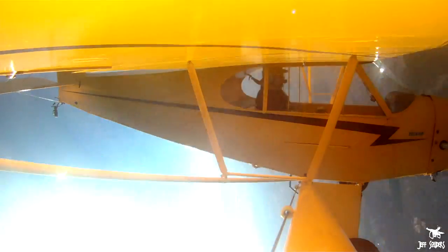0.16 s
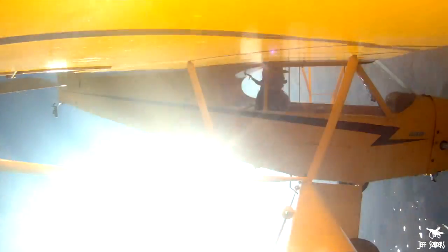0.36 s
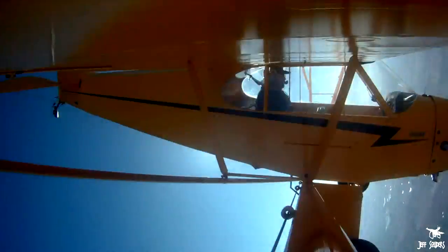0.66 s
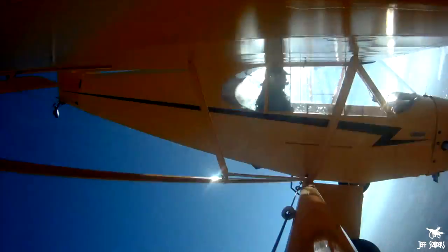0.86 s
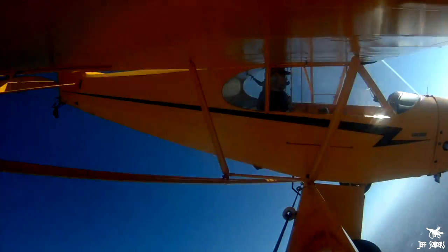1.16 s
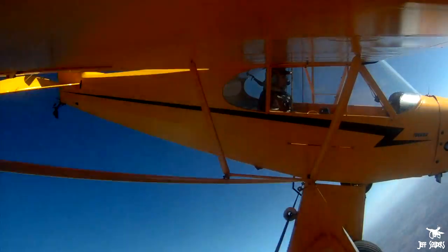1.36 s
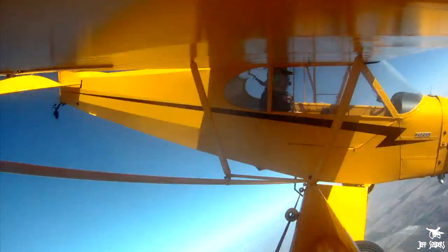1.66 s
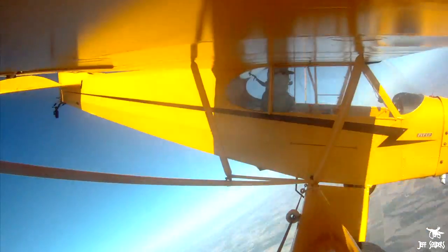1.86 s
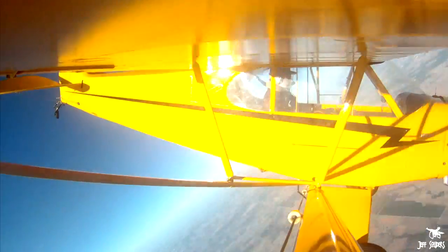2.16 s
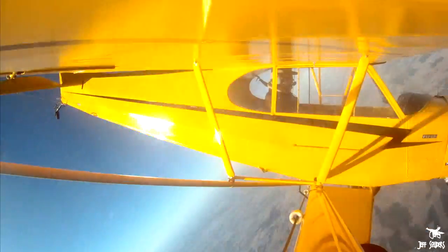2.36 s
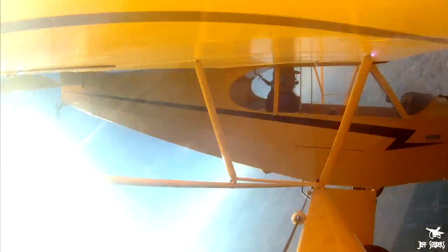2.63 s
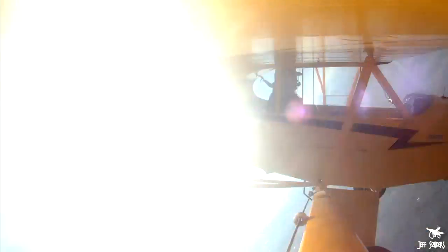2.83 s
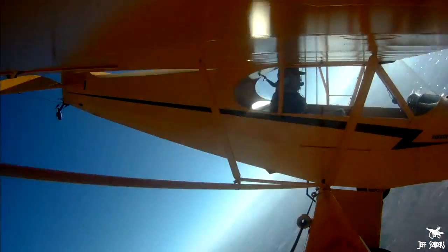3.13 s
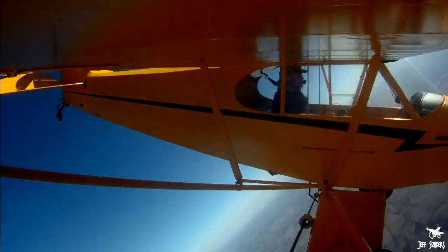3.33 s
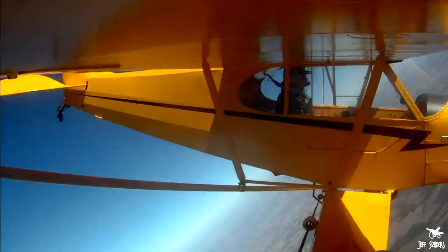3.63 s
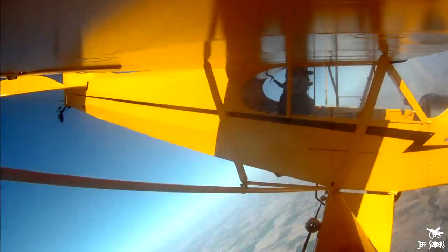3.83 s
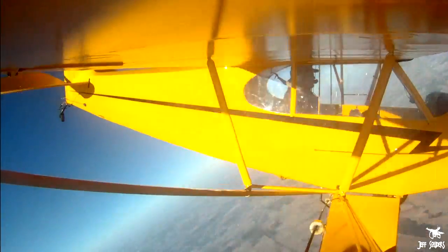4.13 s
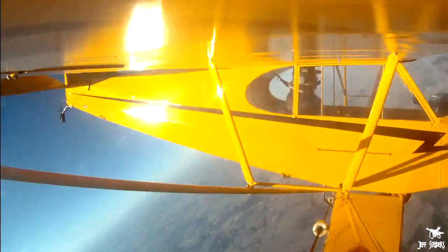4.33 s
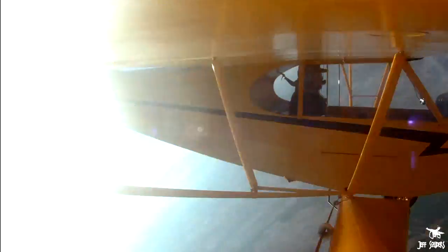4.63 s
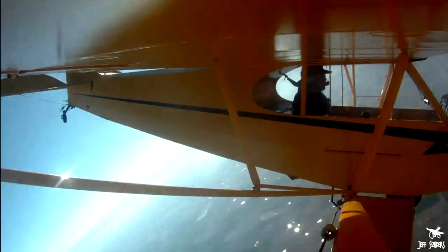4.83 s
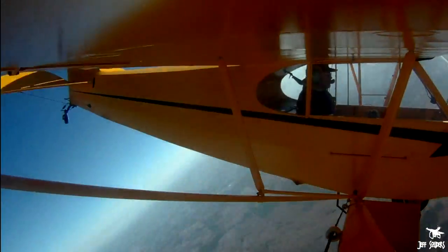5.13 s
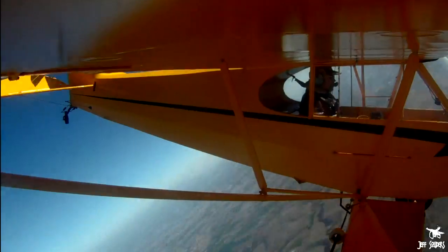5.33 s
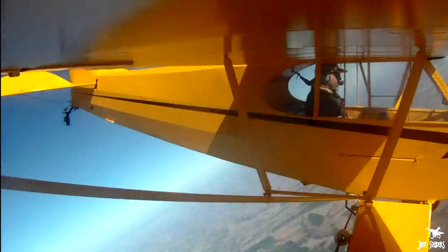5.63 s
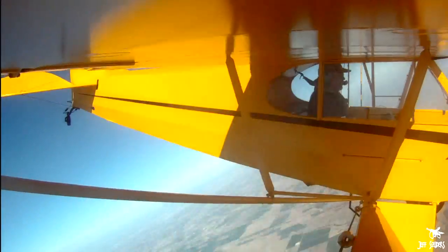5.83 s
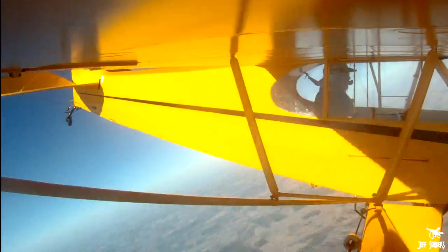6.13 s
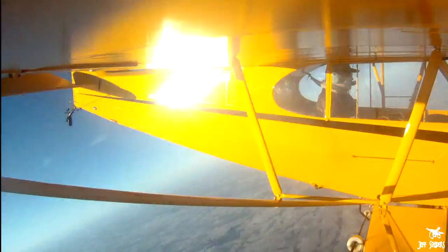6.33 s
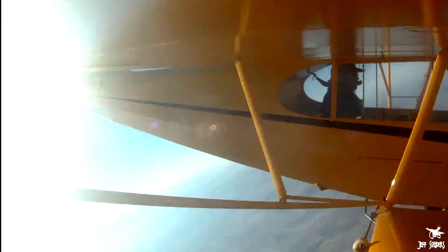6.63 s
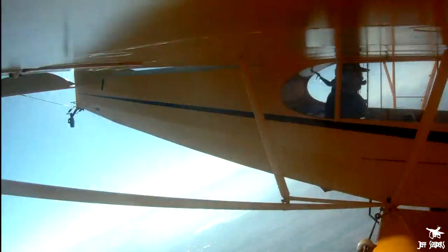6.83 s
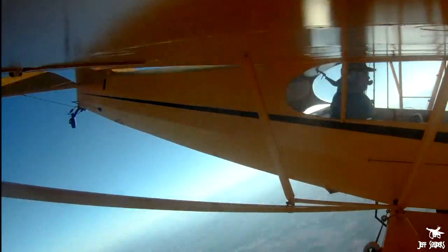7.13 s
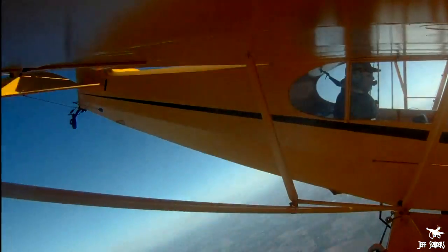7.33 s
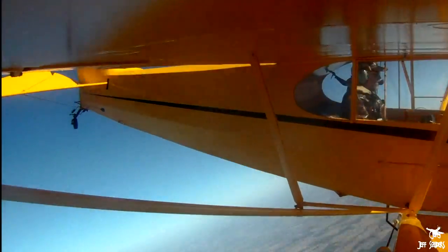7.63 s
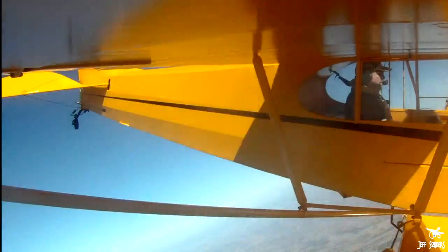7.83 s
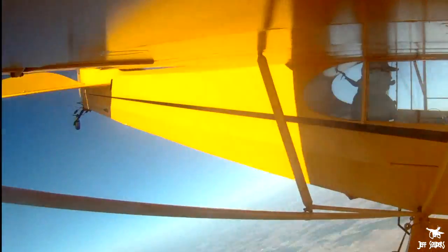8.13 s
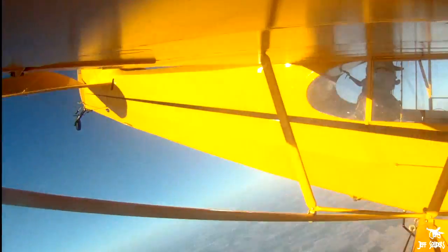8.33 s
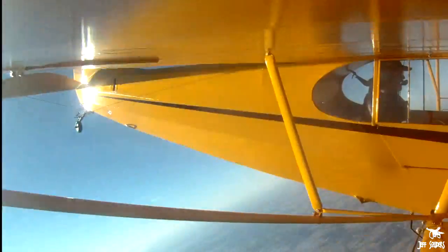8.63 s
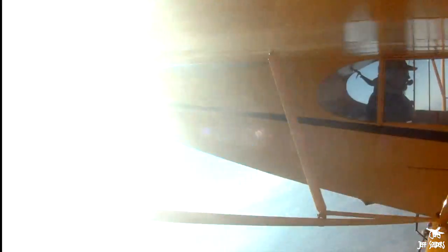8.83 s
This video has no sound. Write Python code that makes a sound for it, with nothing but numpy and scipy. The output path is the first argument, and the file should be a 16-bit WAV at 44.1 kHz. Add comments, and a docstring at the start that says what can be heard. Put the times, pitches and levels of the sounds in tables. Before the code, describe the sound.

Heard from the wing strut, a propeller plane's low drone sags to a lumpy idle while a loose camera case chatters and air roars.

```python
"""The engine and propeller of a light aircraft drone as it is throttled back from full power to idle.
A cased camera on the wing strut hears it: engine orders are sines, swelling in the mount's resonance.
The strut throbs; knocks, rattles and dry ticks are shaped noise and impulses, many timed once a turn.
Filtered noise makes the gusty slipstream roar and hiss; coarse sampling adds a glassy fizz."""
import sys
import numpy as np
from scipy import signal
from scipy.fft import rfft, irfft
from scipy.io import wavfile
from scipy.ndimage import map_coordinates

SR = 44100
rng = np.random.default_rng(int(sys.argv[2]) if len(sys.argv) > 2 else 0)


def put_to_file(sound):
    """Save the sound as 16-bit audio at rate SR, in the file named by the first command-line argument."""
    columns = np.atleast_2d(sound).T  # one column per channel
    safe = np.clip(columns, -1, 1)
    whole_steps = np.round(safe * 32767)
    wavfile.write(sys.argv[1], SR, whole_steps.astype(np.int16))


N = 396018


def amp(db):
    """Decibels to gain."""
    return 10 ** (np.asarray(db) / 20)


def unit(x):
    """Scale to rms 1."""
    return x / np.sqrt(np.mean(x ** 2) + 1e-20)


def along(points, hz):
    """Read (Hz, value) points on a log frequency axis."""
    f, v = np.transpose(points)
    return np.interp(np.log(hz + 1), np.log(np.maximum(f, 1) + 1), v)


def curves(rows):
    """Automation: one value per sample for each column after the time."""
    s, *cols = np.transpose(rows)
    return [np.interp(np.arange(N) / SR, s, c) for c in cols]


def bells(rows):
    """The sum of one smooth bell in dB for each (centre_s, half_width_s, change_db) row."""
    t = np.arange(N) / SR
    return sum(db * np.exp(-((t - s) / width) ** 2) for s, width, db in rows)


def spells(rows, attack_s, release_s):
    """An envelope that rises, holds and dies away for each (start_s, end_s, level_db) row."""
    t = np.arange(N) / SR
    envelopes = []
    for start, end, db in rows:
        rise = np.clip((t - start) / attack_s, 0, 1)
        fall = np.exp(-np.maximum(t - end, 0) / release_s)
        envelopes.append(amp(db) * rise * fall)
    return np.max(envelopes, axis=0)


def wobble(rate_hz):
    """A smooth random curve with rate_hz random knots a second."""
    knots = rng.standard_normal(int(N * rate_hz / SR) + 4)
    return map_coordinates(knots, [np.arange(N) * rate_hz / SR])


def colour(x, spectrum, resonances=(), size=8192):
    """Minimum-phase filter: a broad spectrum with resonances lifted out of it or cut into it."""
    hz = np.fft.rfftfreq(size, 1 / SR)
    db = along(spectrum, hz)
    for f, width, lift in resonances:
        db = db + lift / (1 + (2 * (hz - f) / width) ** 2)
    # folding the cepstrum forward in time makes the filter causal
    cepstrum = irfft(np.log(amp(db)))
    cepstrum[1:size // 2] *= 2
    cepstrum[size // 2 + 1:] = 0
    impulse_response = irfft(np.exp(rfft(cepstrum)))
    return signal.fftconvolve(x, impulse_response)[:len(x)]


def uneven(count, scatter_db):
    """Random gains around 0 dB, kept within two scatters."""
    return amp(scatter_db * np.clip(rng.standard_normal(count), -2, 2))


def bursts(cycles, speed, life_s, scatter_db, hold=1):
    """An envelope that jumps at each whole cycle and decays to 1/e in life_s; hold above 1 flattens its top."""
    whole = np.floor(cycles).astype(int)
    since_jump_s = (cycles % 1) / speed
    return uneven(1024, scatter_db)[whole] * np.exp(-(since_jump_s / life_s) ** hold)


def kicks(cycles, scatter_db):
    """One impulse of uneven size at each whole cycle."""
    whole = np.floor(cycles)
    return np.diff(whole, prepend=whole[0]) * uneven(N, scatter_db)


def add(track, s, sound):
    """Mix a sound into the track at s seconds."""
    part = track[round(s * SR):][:len(sound)]
    part += sound[:len(part)]


# Engine and two-blade propeller harmonics before the mount shapes them: shaft_multiple, relative_level_db
ENGINE_ORDERS = [(1, 10), (1.5, -3.5), (2, 5.5), (2.5, -20), (3, -4.5), (3.5, -20), (4, -3), (4.5, -12),
                 (5, -8), (6, -19.5), (7, -9), (8, -15), (9, -42), (10, -21.5)]
# How the strut and mount pass vibration: freq_hz, gain_db
MOUNT_RESPONSE = [(15, -25), (32, -44), (41, -54), (50, -3), (58, 2.5), (70, 0.5), (76, -5), (86, -13),
                  (110, -10.5), (160, -8.5), (380, -17)]
# Level of the whole drone before gusts: time_s, level_db
DRONE_LEVEL = [(0, -16), (1.2, -16.5), (1.5, -19), (1.85, -14.5), (3.5, -14.5), (5.75, -16.5), (6.2, -22.5),
               (6.75, -20), (7.5, -15.5), (8.05, -27.5), (8.8, -18.5)]
WAVER_DB, WAVER_RAD = 2.8, .65  # how far the orders waver in level and in phase
GUST_DRONE = 0.37  # dB by which the drone gives way for each dB of a gust


def drone(speed, turns):
    """Each order is loud while it lies in the mount's resonance; the blade order is the steadiest."""
    tone, power = np.zeros(N), np.zeros(N)
    for order, db in ENGINE_ORDERS:
        unsteady = .12 if order == 2 else 1  # order 2 is the blade order
        order_db = db + along(MOUNT_RESPONSE, order * speed)
        size = amp(order_db + WAVER_DB * unsteady * wobble(5))
        phase = 2 * np.pi * order * turns + WAVER_RAD * unsteady * wobble(8)
        tone += size * np.sin(phase)
        power += size ** 2 / 2
    even_tone = tone / np.sqrt(power)  # evened out; the level curve and the gusts set the loudness
    return amp(curves(DRONE_LEVEL)[0] - GUST_DRONE * bells(GUSTS)) * even_tone


# Broad tone of the shaken strut: freq_hz, relative_level_db_per_hz
STRUT_TONE = [(60, -13), (85, -31.5), (105, 6), (130, 0.5), (180, 1.5), (220, 2), (290, -5), (370, -7),
              (480, -26), (800, -35)]
# Level of the strut's throb: time_s, level_db
THROB_LEVEL = [(0, -46), (1.6, -36), (2.4, -34.5), (3.7, -35), (4.05, -26.5), (6, -31.5), (6.4, -30),
               (9, -45)]


def throb(turns):
    """One blade shakes the strut harder than the other, giving lines at every multiple of the shaft speed."""
    strong_blade = kicks(turns - .2, scatter_db=2.0)
    weak_blade = 0.28 * kicks(turns - .7, scatter_db=6.0)
    strut_modes = [(108, 16, 6.4), (190, 12, 6.2), (285, 32, 3.7)]  # freq_hz, width_hz, lift_db
    return amp(curves(THROB_LEVEL)[0]) * unit(colour(strong_blade + weak_blade, STRUT_TONE, strut_modes))


# Point of the turn at which the loose case strikes: time_s, strike_point_turns
CASE_STRIKE_POINT = [(1.2, 0.41), (1.8, 0.67), (2.65, 0.74), (2.73, .65), (3.2, 0.51), (3.75, 0.47),
                     (4.7, 0.37), (5, 0.34), (5.9, .47), (6.2, .78), (6.45, 1.04), (7.25, 1.34), (9, 1.79)]
# Broad tone of the case contacts: freq_hz, relative_level_db_per_hz
RATTLE_TONE = [(300, -13.5), (700, -19), (1150, -27), (1450, -3.5), (1800, 7), (2200, 2), (2450, -8.5),
               (2750, -14.5), (3350, -21.5), (3650, -21), (3950, -16), (4400, -29), (5000, -27.5),
               (5900, -36)]
# Air and wall resonances of the camera case: freq_hz, width_hz, lift_db
CASE_RESONANCES = [(1111, 20, 8.5), (1225, 29, 7), (1373, 16, 7.5), (1491, 22, 9.5), (1777.7, 17, 11.5),
                   (1910, 23, 5.5), (1950, 58, -6), (2150, 78, 2.5), (2310, 38, 10.5), (2580, 37, 11),
                   (3079, 160, 12), (3613, 199, 18.5)]
# Spells in which the case rattles: start_s, end_s, level_db
RATTLE_SPELLS = [(.18, .22, -29.5), (.92, .99, -31), (1.01, 1.16, -24.5), (1.17, 1.37, -28),
                 (1.39, 1.48, -24.5), (1.5, 1.62, -27.5), (1.63, 1.81, -27), (2.73, 2.98, -25.5),
                 (3, 3.45, -22), (3.5, 3.55, -26), (3.63, 3.71, -26.5), (3.72, 4.15, -24),
                 (4.18, 4.7, -26.5), (4.76, 5.24, -25), (5.34, 6.12, -24), (6.17, 6.46, -23.5),
                 (6.49, 6.56, -18), (6.58, 6.69, -22.5), (6.785, 6.81, -26.5), (6.885, 6.92, -26.5),
                 (6.94, 7.09, -23.5), (7.18, 7.22, -34.5), (8.14, 8.25, -29), (8.54, 8.68, -39)]
RATTLE_ATTACK_S, RATTLE_RELEASE_S = 0.0098, 0.044
RATTLE_REST_DB = -39  # the chatter between spells
CHATTER_LIFE_S, CHATTER_HOLD = .011, 1.8  # length of each chatter; how squarely it ends
CHATTER_REST = .33  # contact strength always present under the chatter
STRIKE_LIFE_S, STRIKE_SIZE = 0.0078, 0.42  # dry rebounds: their length; their size over the ringing


def rattle(speed, turns):
    """Once a turn the loose case strikes with dry rebounds and chatters in tiny contacts that ring it."""
    cycles = turns - curves(CASE_STRIKE_POINT)[0]
    rebounds = rng.standard_normal(N) * bursts(cycles, speed, STRIKE_LIFE_S, scatter_db=2.5, hold=1.2)
    strikes = unit(colour(rebounds, RATTLE_TONE))
    chatter = bursts(cycles, speed, CHATTER_LIFE_S, scatter_db=0.0, hold=CHATTER_HOLD) + CHATTER_REST
    contacts = rng.standard_normal(N) * amp(1.2 * wobble(900)) * chatter
    ringing = unit(colour(contacts, RATTLE_TONE, CASE_RESONANCES))
    rattling = spells(RATTLE_SPELLS, RATTLE_ATTACK_S, RATTLE_RELEASE_S)
    level = np.maximum(rattling, amp(RATTLE_REST_DB))
    return level * unit(ringing + STRIKE_SIZE * strikes)


# Hardest strikes of the case, before the ceiling below: start_s, peak_db
CASE_CLACKS = [(2.999, -9), (3.0919, -6), (3.2485, -11), (3.312, -9.5), (3.3762, -8), (3.4082, -7.5),
               (3.7923, -9.5), (3.8262, -9.5), (4.0305, -11.5), (4.0986, -12.5), (4.267, -8.5),
               (4.3735, -12.5), (4.6191, -7.5), (4.6554, -6.5), (4.6947, -7.5), (4.7676, -19), (4.907, -9),
               (5.01, -8.5), (5.1216, -14), (5.687, -9.5), (5.8437, -10.5), (5.883, -10), (6.2225, 1),
               (6.9404, -5.5), (7.0706, -7)]
CLACK_ATTACK_S, CLACK_LIFE_S = 0.00099, 0.004
CLACK_MAX_DB = -4  # no hard strike peaks above this


def clacks():
    """A hard strike of the case is a noise burst that rises in about a millisecond and dies within a few."""
    out, t = np.zeros(N), np.arange(SR // 20) / SR
    envelope = np.exp(-t / CLACK_LIFE_S) * (1 - np.exp(-t / CLACK_ATTACK_S))
    for s, db in CASE_CLACKS:
        contacts = colour(rng.standard_normal(len(t)), RATTLE_TONE) * envelope
        add(out, s, amp(min(db, CLACK_MAX_DB)) * contacts / np.abs(contacts).max())
    return out


# Point of the turn at which the mount knocks: time_s, knock_point_turns
MOUNT_KNOCK_POINT = [(1.9, .27), (3.4, 0.38), (3.85, 0.46), (5.5, 0.52), (6.1, .63), (7.2, 0.97),
                     (8.98, 0.85)]
# Dull tone of the main knock: freq_hz, relative_level_db_per_hz
KNOCK_TONE = [(150, 4), (400, 0.5), (600, 1), (760, 4), (900, -3), (1100, -9), (1600, -12), (4000, -33)]
# Tone of the soft knock at the other end of the play: freq_hz, relative_level_db_per_hz
SOFT_KNOCK_TONE = [(150, -14), (300, 0), (450, -5.5), (750, -4.5), (1200, -41), (3000, -37)]
# Level of the knocks from play in the mount: time_s, level_db
KNOCK_LEVEL = [(1.88, -36), (3.6, -36.5), (3.9, -27), (4.5, -33), (5.3, -36.5), (5.75, -36.5), (6.35, -43),
               (7.1, -48), (7.7, -30.5), (8.98, -35.5)]
# The softer, earlier knock at the other end of the play: time_s, size_ratio (over the main knock)
SOFT_KNOCK_SIZE = [(3.6, 0), (4, 0.4), (5.3, 0.87), (5.8, 0.056), (6.2, 0.11)]
KNOCK_START_S = 1.8  # the mount sits tight at full power and works loose here
KNOCK_LIFE_S, KNOCK_RUB = 0.0017, 1  # the rub with each knock: its decay; its size over the blow


def mount_knocks(speed, turns):
    """Once a turn the mount knocks dully at both ends of its play."""
    cycles = turns - curves(MOUNT_KNOCK_POINT)[0]
    blows = unit(kicks(cycles, scatter_db=3.0))
    rubs = unit(bursts(cycles, speed, KNOCK_LIFE_S, scatter_db=3) * rng.standard_normal(N))
    knocks = unit(colour(blows + KNOCK_RUB * rubs, KNOCK_TONE))
    # the soft end of the play is reached 0.16 turn before the main knock
    soft = bursts(cycles + 0.16, speed, life_s=0.0025, scatter_db=1.5) * rng.standard_normal(N)
    knocks += curves(SOFT_KNOCK_SIZE)[0] * unit(colour(soft, SOFT_KNOCK_TONE))
    loose = np.arange(N) / SR > KNOCK_START_S
    return loose * amp(curves(KNOCK_LEVEL)[0]) * knocks


# Hardest knocks of the mount: start_s, peak_db
HARD_KNOCKS = [(2.006, -14), (2.549, -16.5), (2.674, -14.5), (3.829, -15), (4.03, -14), (4.133, -12.5),
               (4.804, -9.5), (5.488, -11)]
HARD_KNOCK_LIFE_S = 0.0059


def hard_knocks():
    """Now and then the mount hits its stop much harder: a decaying noise burst with the dull knock tone."""
    out, t = np.zeros(N), np.arange(SR // 20) / SR
    for s, db in HARD_KNOCKS:
        burst = rng.standard_normal(len(t)) * np.exp(-t / HARD_KNOCK_LIFE_S)
        knock = colour(burst, KNOCK_TONE)
        add(out, s, amp(db) * knock / np.abs(knock).max())
    return out


# Bright tone of the dry ticks, shared by the snap of a jolt: freq_hz, relative_level_db_per_hz
TICK_TONE = [(300, -14), (900, -28), (2000, -35), (3500, -6.5), (4800, 3.5), (5500, -3), (6000, -7.5)]
# Level of the dry ticks: time_s, level_db
TICK_LEVEL = [(2.6, -64), (2.75, -49), (5.2, -52), (5.65, -41), (6.2, -52), (7.4, -88), (8.3, -48),
              (8.98, -55)]
TICK_POINT_TURNS, TICK_LIFE_S = .08, .0008


def ticks(speed, turns):
    """Dry, bright ticks come once a turn: very short bursts of filtered noise."""
    snaps = bursts(turns - TICK_POINT_TURNS, speed, TICK_LIFE_S, scatter_db=4.0)
    return amp(curves(TICK_LEVEL)[0]) * unit(colour(snaps * rng.standard_normal(N), TICK_TONE))


# Jolts of the mount, some repeating once a turn: start_s, blow_count, snap_peak_db, thump_gain_db
MOUNT_JOLTS = [(1.481, 1, -41, -1), (1.676, 1, -36, -6), (5.872, 5, -42, -6), (6.087, 1, -18.5, -4.5),
               (6.1715, 3, -22, -25), (6.2936, 1, -20, -8), (6.345, 1, -24, -10), (6.3845, 1, -16, -3.5),
               (6.427, 1, -21, -5.5), (6.4747, 2, -21, -26), (6.6727, 1, -32, -32), (6.731, 1, -29, -25),
               (7.6857, 1, -20.5, -10), (7.706, 1, -19.5, -28), (7.896, 1, -14, -3.5),
               (8.158, 1, -19.5, -5)]
JOLT_KNOCK_DB = 3.5  # the dull knock over the snap
THUMP_HZ, THUMP_RISE_S = 73.6, 0.0026  # pitch and rise time of a jolt's push of air


def jolts(turns):
    """A jolt is a sharp snap and a dull knock with one low, quickly dying push of air."""
    out, t = np.zeros(N), np.arange(SR // 20) / SR
    push_envelope = (t / THUMP_RISE_S) * np.exp(1 - t / THUMP_RISE_S)
    push = -np.sin(2 * np.pi * THUMP_HZ * t) * push_envelope
    dull_tone = [(150, -9), (700, -9.5), (2000, -6), (4000, -11), (6000, -36)]  # freq_hz, relative_level_db
    for first, blows, snap_db, thump_db in MOUNT_JOLTS:
        blow_turns = turns[round(first * SR)] + np.arange(round(blows))
        for s in np.searchsorted(turns, blow_turns) / SR:
            contact = rng.standard_normal(len(t)) * t * np.exp(-t / 0.001)
            snap = colour(contact, TICK_TONE)
            knock = colour(contact, dull_tone)
            blow = snap / np.abs(snap).max() + amp(JOLT_KNOCK_DB) * knock / np.abs(knock).max()
            add(out, s, amp(snap_db) * blow + amp(thump_db) * push)
    return out


# Steady slipstream before gusts: time_s, roar_level_db, hiss_level_db
WIND_LEVEL = [(0, -26.5, -27.5), (.8, -27, -31.5), (1.4, -20.5, -27.5), (2, -27.5, -38.5), (2.45, -37, -41),
              (3.75, -32.5, -33.5), (4.05, -27, -37), (5.4, -26, -33), (5.9, -33.5, -36),
              (6.45, -28, -30.5), (6.75, -19, -32.5), (7.6, -18.5, -32.5), (8.5, -17, -29.5),
              (8.98, -18.5, -33)]
# Gusts, and a lull where negative: centre_s, half_width_s, change_db
GUSTS = [(.1, .05, 1), (1.2, 0.035, -1.5), (1.44, 0.026, 3), (6.53, 0.023, 4), (7.07, 0.069, 5.5),
         (7.55, 0.084, 1.5), (7.88, 0.021, 3.5), (8.12, 0.031, 7), (8.38, 0.0097, 6), (8.5, 0.0066, 2),
         (8.58, 0.013, 2.5)]
GUST_HISS = 1  # dB of hiss for each dB of a gust
# Airspeed, which blends the slow and fast hiss: time_s, airspeed_ratio (0 slow, 1 fast)
AIRSPEED = [(0, 0.98), (1.2, 1), (2, 0.0048), (6, 0.0046), (7, 0.36), (9, 0)]
# Low tone of the roar: freq_hz, relative_level_db_per_hz
ROAR_TONE = [(25, -12.5), (42, 7), (60, 12.5), (90, -11.5), (150, 2), (205, -5), (275, -0.5), (370, -6),
             (470, -16.5), (650, -34.5), (1200, -67.5)]
# Tone of fast air before the case resonances: freq_hz, relative_level_db_per_hz
FAST_HISS_TONE = [(250, -25), (480, -7.5), (570, 0), (660, -44), (790, -11.5), (930, -4), (1200, 2.5),
                  (1650, -9.5), (2000, 5), (2450, -13), (3400, -29.5), (4100, -27), (4900, -27.5),
                  (5900, -36)]
# Tone of slow air before the case resonances: freq_hz, relative_level_db_per_hz
SLOW_HISS_TONE = [(250, -6), (450, -8.5), (650, -1.5), (850, 6.5), (1200, 1), (1650, 1.5), (2000, 8.5),
                  (2450, -17.5), (3400, -25), (4100, -17.5), (4900, -29.5), (5900, -37)]
# Thin sizzle of the air at top speed: time_s, level_db
SIZZLE_LEVEL = [(0, -45.5), (.5, -46.5), (.8, -53.5), (1.3, -62), (2, -83)]


def slipstream(turns):
    """Turbulent air roars on the case and hisses through its resonances, pulsing with the propeller wash."""
    roar_db, hiss_db = curves(WIND_LEVEL)
    gust_db = bells(GUSTS)
    fast = np.clip(curves(AIRSPEED)[0], 0, 1)
    wash_db = 1.0 * np.cos(2 * np.pi * (turns - .25))  # one pulse a turn
    eddies_db = 1.9 * wobble(45) + wash_db
    roar = colour(rng.standard_normal(N) * amp(eddies_db + 0.68 * wobble(25)), ROAR_TONE)
    flutter_db = 1.0 * (1 - fast) * wobble(32)  # slow air tears off the case in gusts

    def flow():
        """Fresh turbulent noise that shares the eddies and flutter."""
        return rng.standard_normal(N) * amp(eddies_db + flutter_db + 2.17 * wobble(220))

    hiss = np.sqrt(fast) * unit(colour(flow(), FAST_HISS_TONE, CASE_RESONANCES))
    hiss += np.sqrt(1 - fast) * unit(colour(flow(), SLOW_HISS_TONE, CASE_RESONANCES))
    sizzle_tone = [(1000, -13), (3500, -3), (4900, 13.5), (6000, -6)]  # freq_hz, relative_level_db_per_hz
    sizzle = amp(curves(SIZZLE_LEVEL)[0]) * unit(colour(flow(), sizzle_tone))
    roar = amp(roar_db + gust_db) * unit(roar)
    hiss = amp(hiss_db + GUST_HISS * gust_db) * hiss
    return roar + hiss + sizzle


# Crankshaft speed as the throttle comes back: time_s, speed_turns_per_s
SHAFT_SPEED = [(0.0, 37.19), (0.47, 37.24), (1.73, 35.94), (1.99, 33.92), (2.39, 33.03), (2.82, 31.6),
               (3.46, 31.33), (4.44, 28.08), (5.06, 28.0), (5.54, 26.09), (6.22, 24.46), (6.7, 20.13),
               (7.87, 15.41), (8.54, 14.86), (8.74, 15.78), (9.0, 15.36)]
# Brief dips of the whole sound: centre_s, half_width_s, change_db
LEVEL_DIPS = [(1.53, 0.04, -5.5), (1.72, 0.028, -4), (6.14, 0.0083, 0), (7.76, 0.037, -1.5),
              (7.95, 0.051, -5), (8.21, 0.027, -4), (8.91, 0.038, -5)]


def scene():
    """Mix every layer: the crankshaft paces engine, strut, rattle, knocks and ticks, and pulses the air."""
    speed = curves(SHAFT_SPEED)[0]
    turns = np.cumsum(speed) / SR
    engine = drone(speed, turns) + throb(turns)
    case = rattle(speed, turns) + clacks()
    mount = mount_knocks(speed, turns) + hard_knocks() + jolts(turns)
    layers = engine + case + mount + ticks(speed, turns) + slipstream(turns)
    return (amp(bells(LEVEL_DIPS)) * layers)[None]


HOLD_HZ, TOP_HZ = 12000, 15400  # the camera's coarse sampling rate; the top of its output band


def record(dry):
    """The camera rounds off peaks, then samples coarsely and holds, mirroring the sound into the treble."""
    hz = np.fft.rfftfreq(N, 1 / SR)
    rounded = dry / (1 + np.abs(dry / .85) ** 8) ** (1 / 8)
    guard = 1 / np.sqrt(1 + (hz / 5650) ** 60)  # steep low-pass ahead of the sampling
    count = round(N * HOLD_HZ / SR)
    samples = irfft(rfft(rounded) * guard, count) * count / N
    held = signal.resample(np.repeat(samples, 4, axis=-1), N, axis=-1)  # each value held for four steps
    top_cut = np.sqrt(1 + (hz / TOP_HZ) ** 160)
    return irfft(rfft(held) / top_cut, N)


dry = scene()
out = record(dry)
put_to_file(out)
```